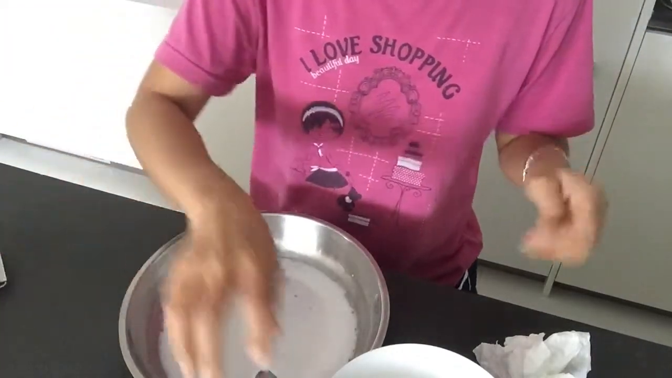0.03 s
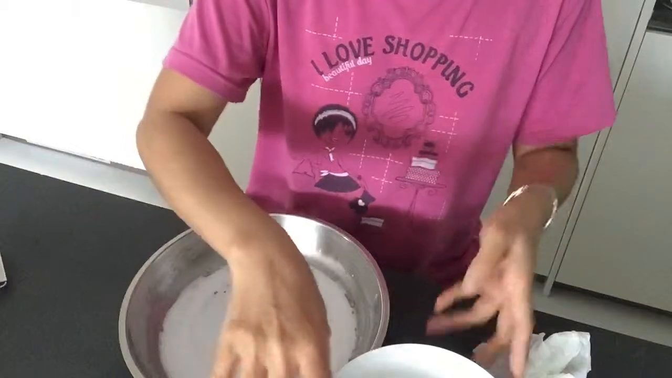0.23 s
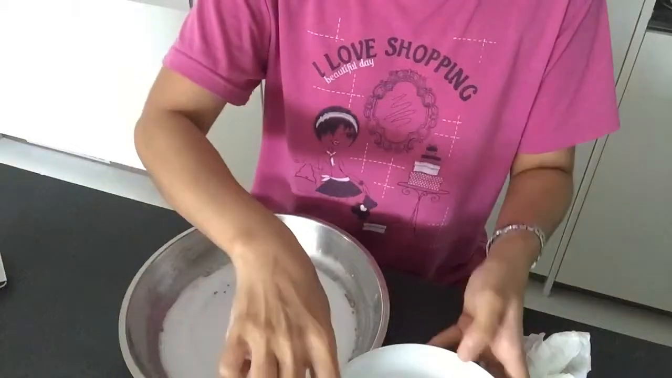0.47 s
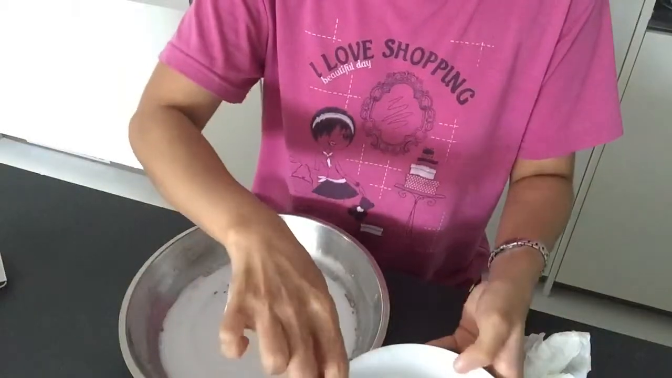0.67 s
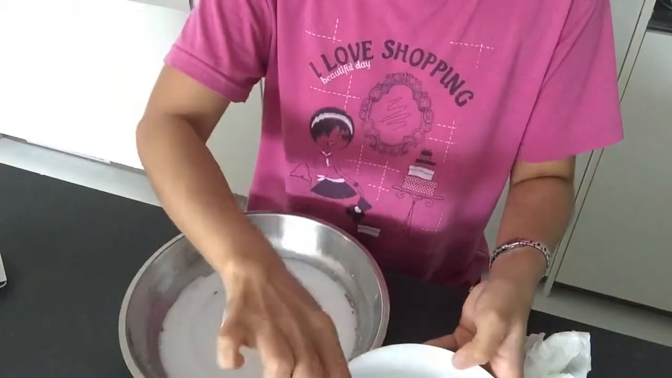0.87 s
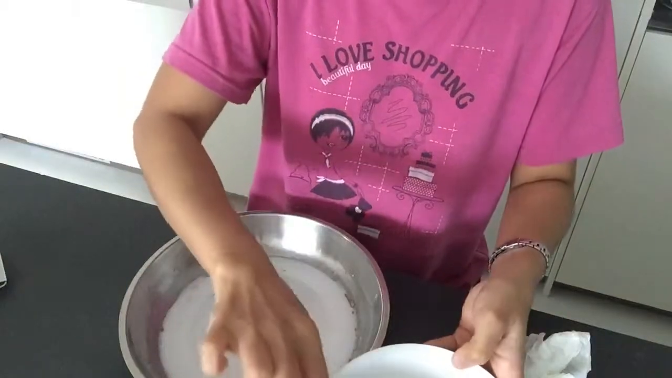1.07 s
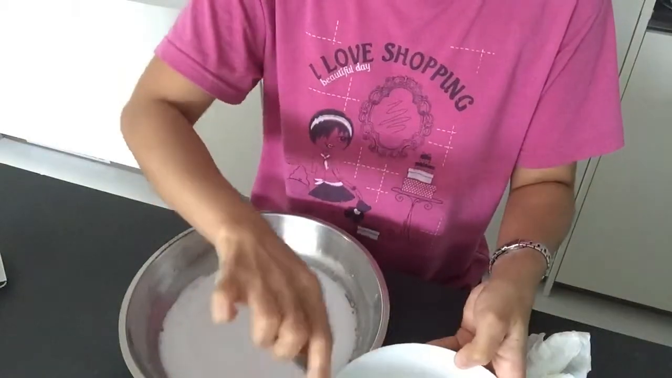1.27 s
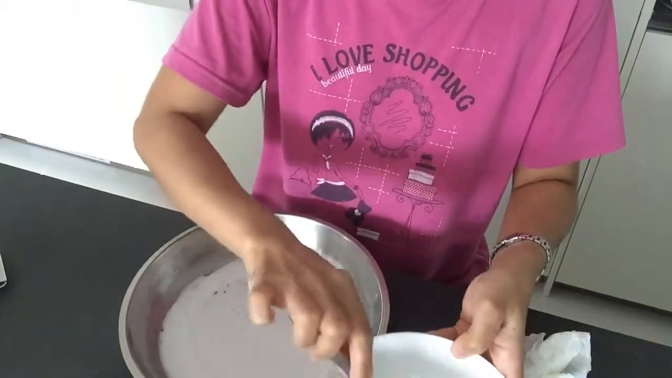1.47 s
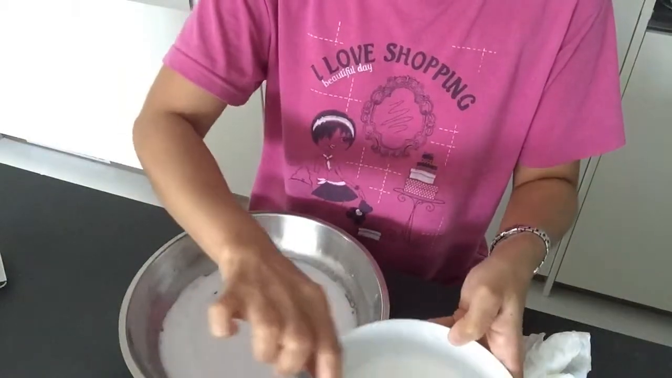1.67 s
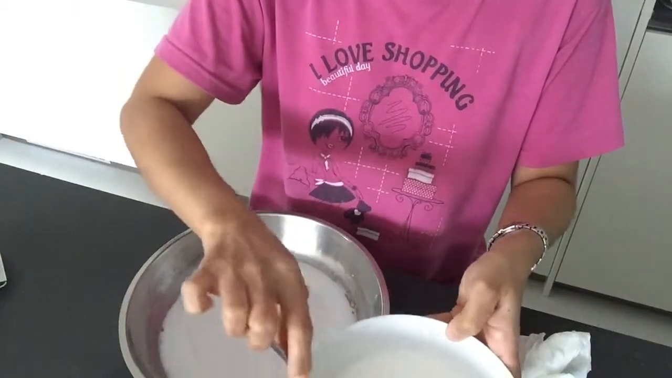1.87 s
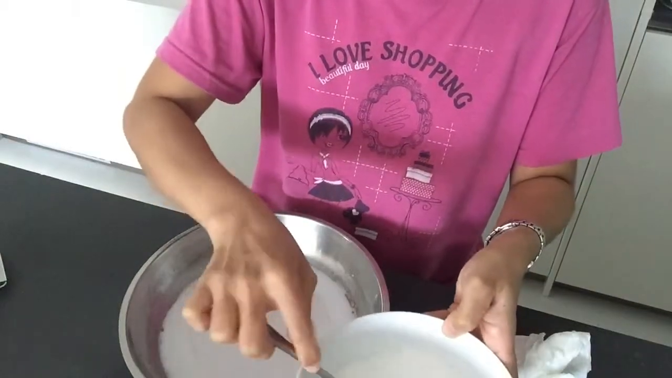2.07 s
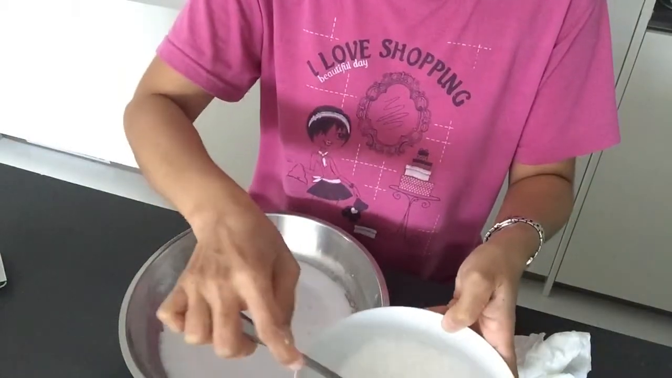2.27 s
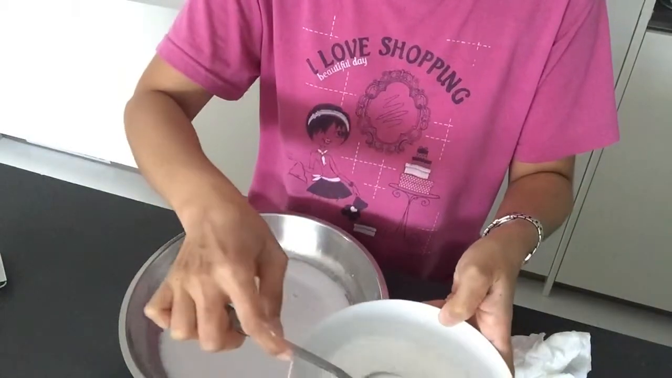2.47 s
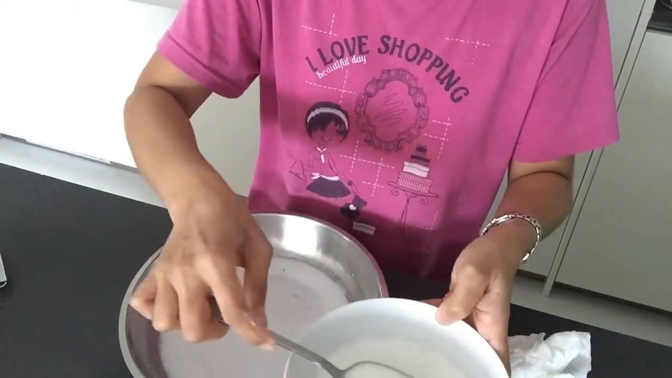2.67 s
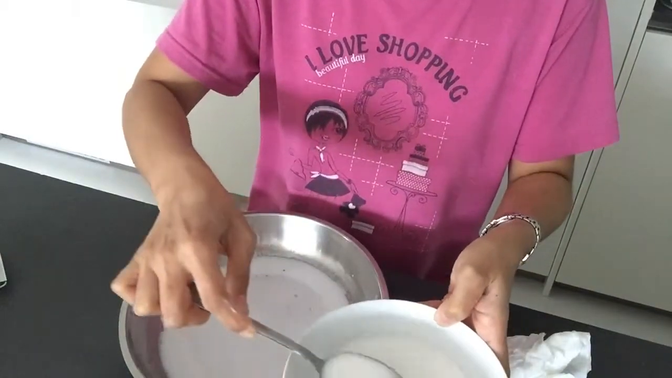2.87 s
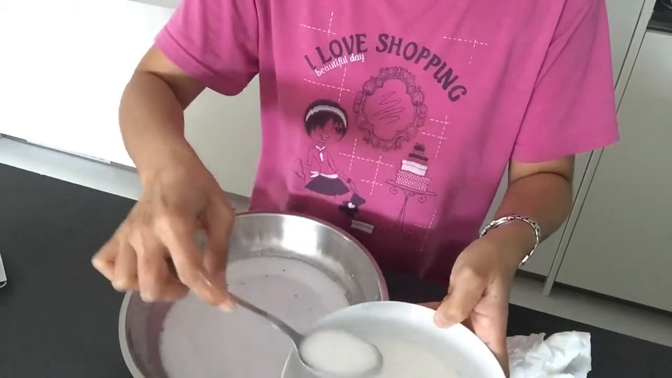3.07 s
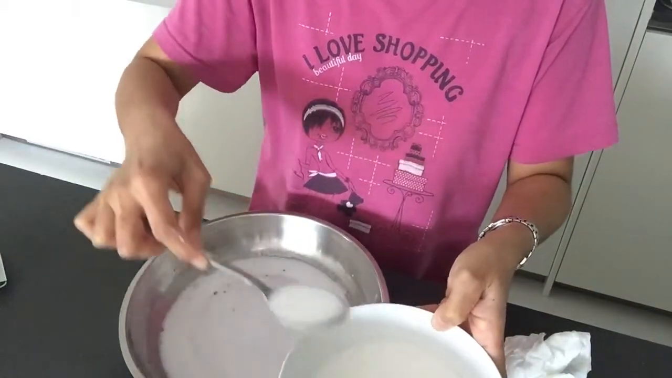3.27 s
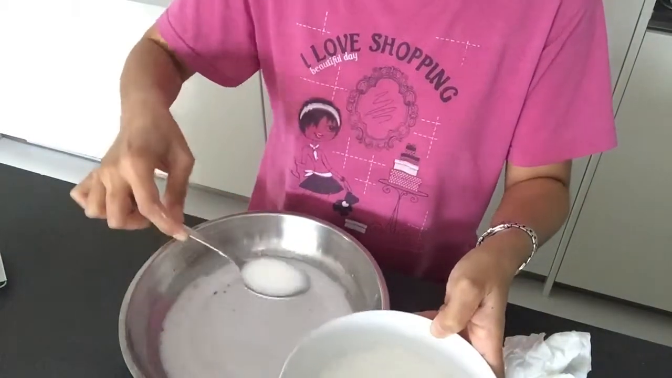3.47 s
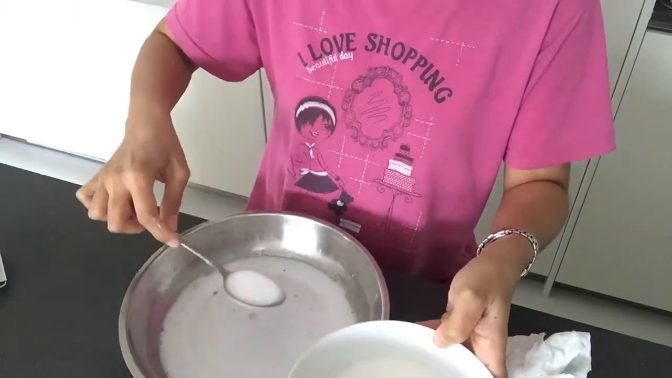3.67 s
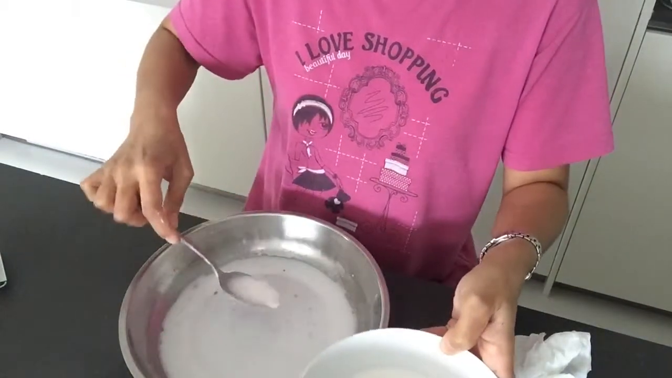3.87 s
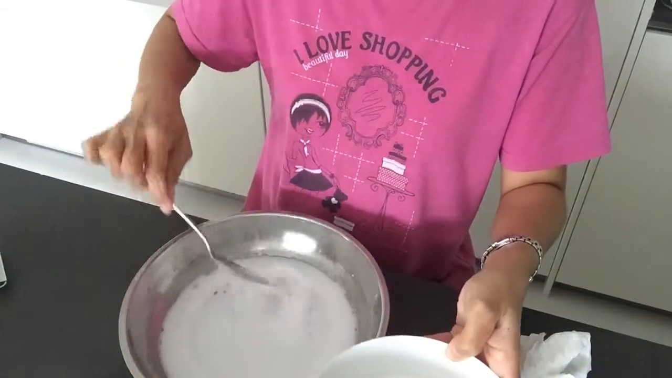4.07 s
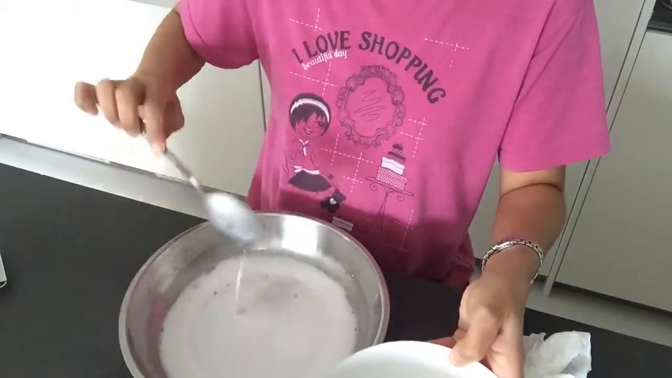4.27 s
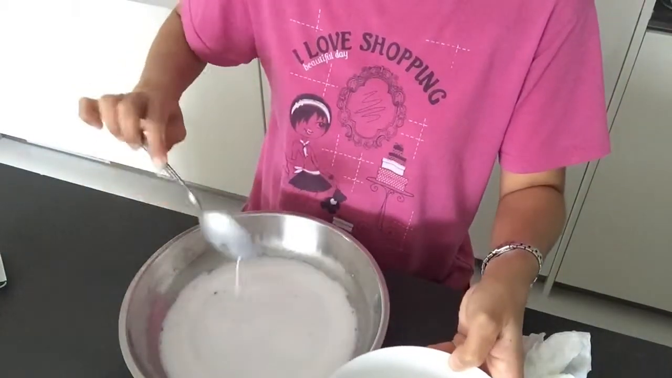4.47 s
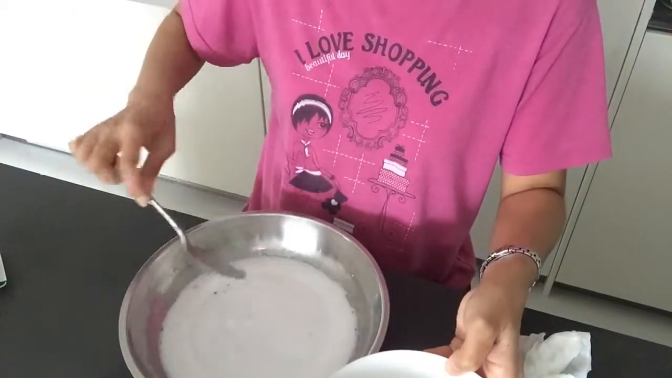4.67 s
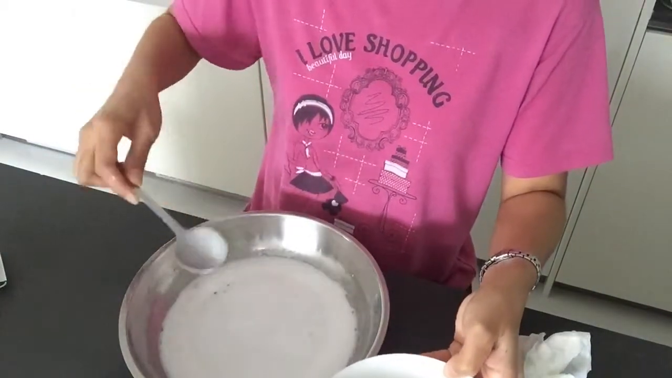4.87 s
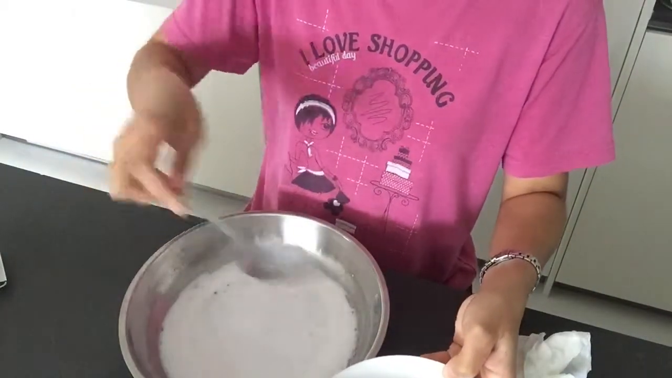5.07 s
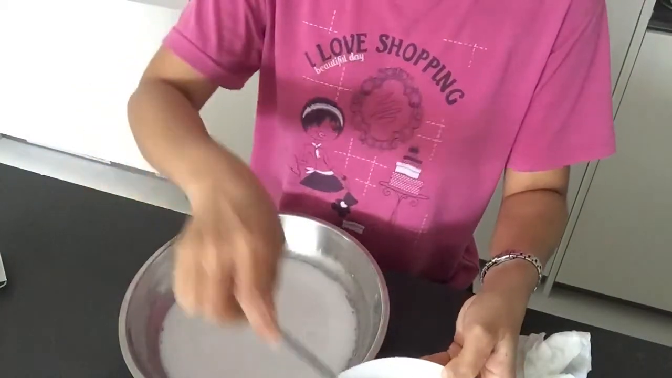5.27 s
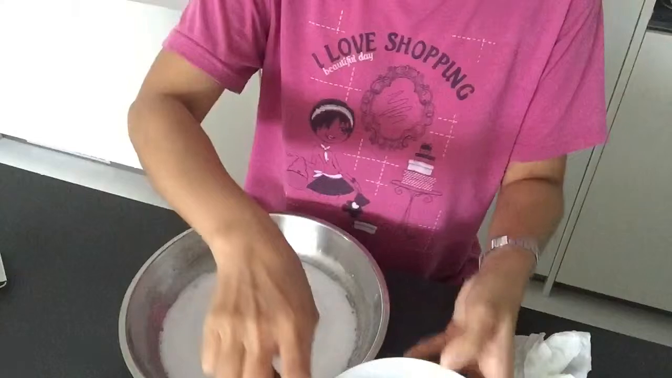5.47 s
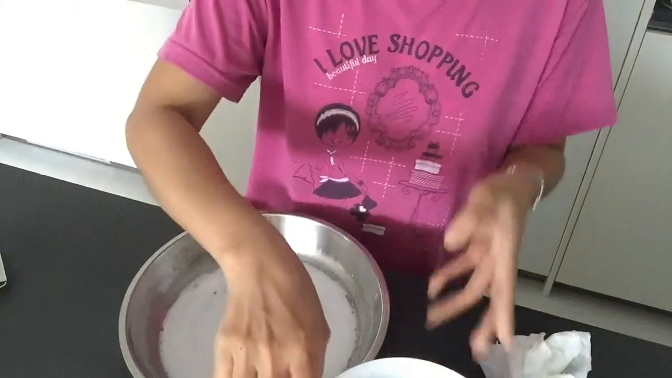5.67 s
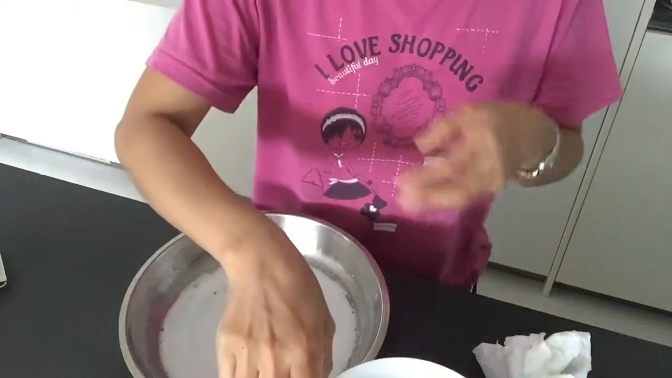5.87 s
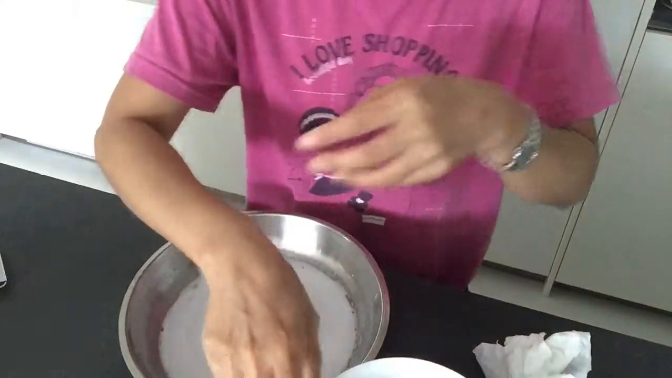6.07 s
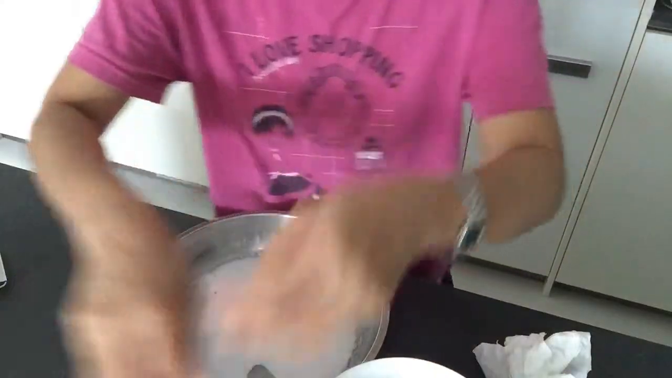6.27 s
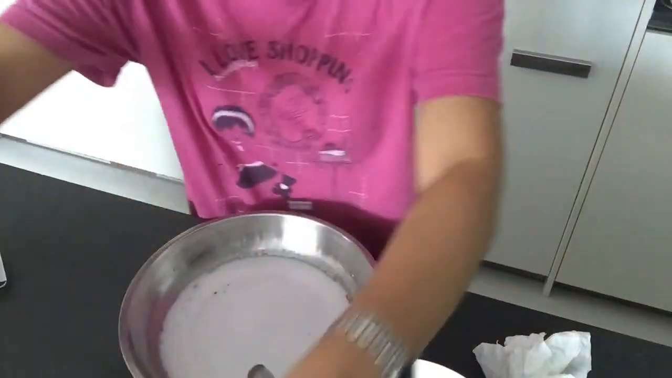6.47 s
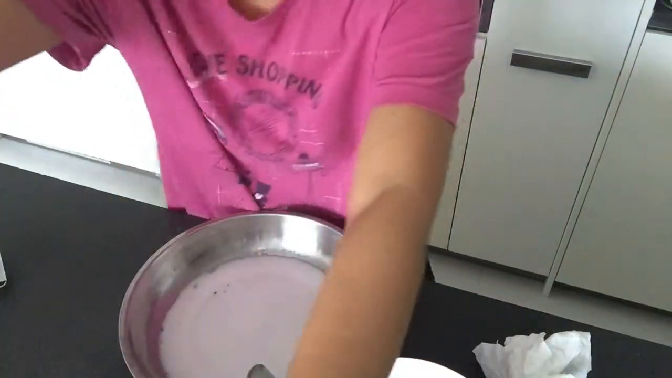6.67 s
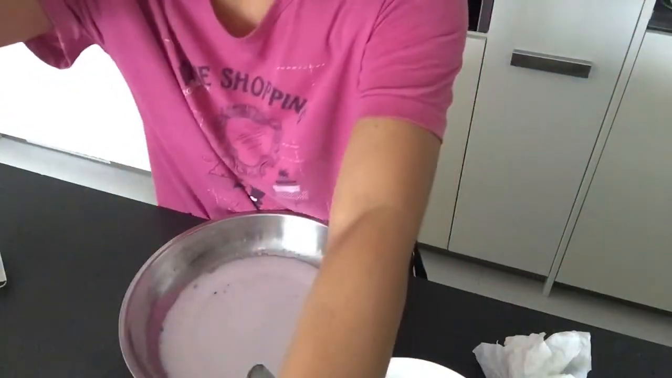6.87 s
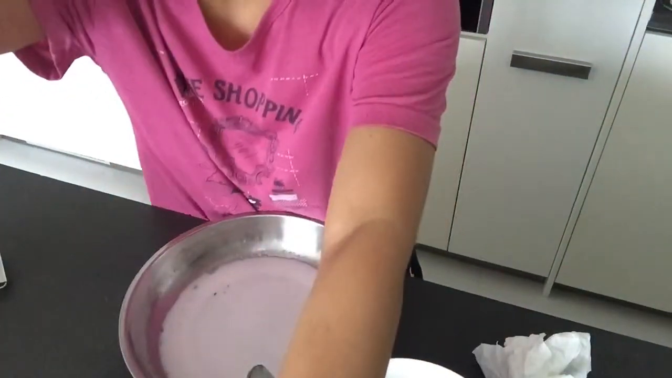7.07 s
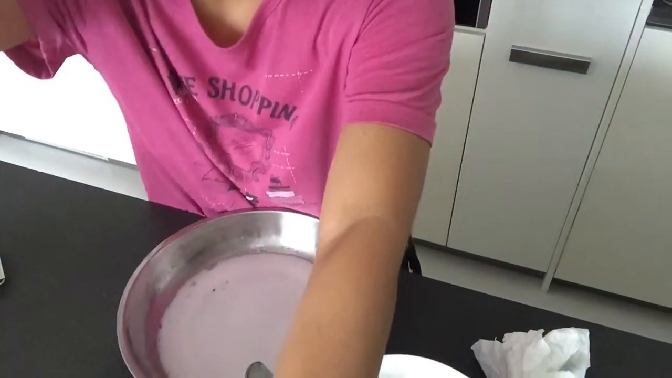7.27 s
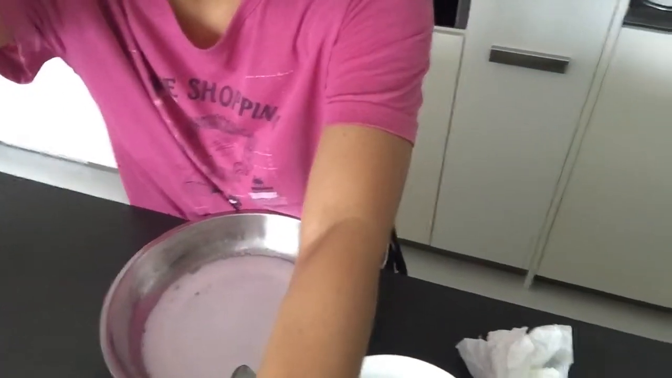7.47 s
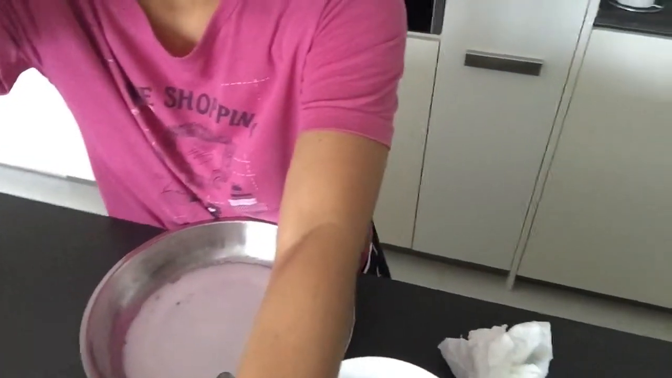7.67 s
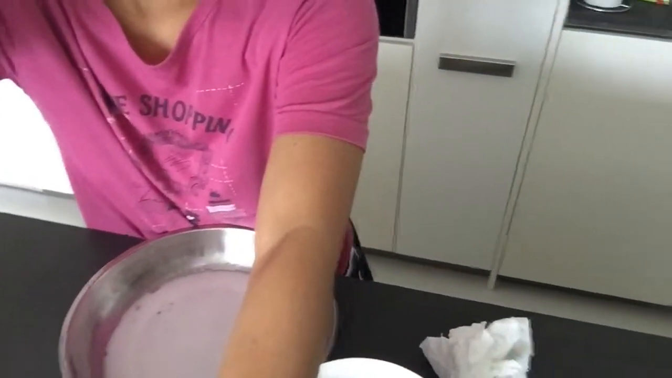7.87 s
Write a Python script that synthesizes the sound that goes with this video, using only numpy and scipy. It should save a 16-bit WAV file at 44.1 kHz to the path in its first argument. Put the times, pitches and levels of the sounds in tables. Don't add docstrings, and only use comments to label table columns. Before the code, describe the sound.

Close in a small reflective kitchen, a china bowl clacks loudly, a steel spoon drops in, clinks and scrapes briefly. After a quiet pause the spoon knocks dully twice on a full metal pan, distorting the microphone. The bowl is set down and rattles to rest; soft handling thumps end it over steady air hiss and fridge hum.

```python
import sys
import numpy as np
from scipy import signal
from scipy.fft import rfft, irfft
from scipy.io import wavfile
from scipy.ndimage import uniform_filter1d, map_coordinates

SR = 44100
rng = np.random.default_rng(int(sys.argv[2]) if len(sys.argv) > 2 else 0)


def makeup_ratio(level_db):
    decades = np.asarray(level_db, float) / 20
    return 10 ** decades


def dump(signal):
    limited = np.clip(np.atleast_2d(signal).T, -1, 1)
    pcm = np.round(limited * 32767).astype(np.int16)
    wavfile.write(sys.argv[1], SR, pcm)


N = 349272

# start in seconds, peak in dB, tilt in dB per octave, chatter T60 in seconds,
# room share in dB.
SPOON_TICKS = [(1.0709, -8.5, -2, 0.01, -8.5), (1.0787, -13, 0, 0.021, -3), (1.329, -11.5, -5, 0.0032, -3),
               (1.521, -33.5, -1, 0.04, 6), (1.5404, -4, -8, 0.0032, -9), (1.625, -28, 4.5, 0.013, -20),
               (1.729, -41, -6.5, .02, 9.5), (2.088, -24.5, 27, 0.0055, -8), (2.112, -26, 8.5, 0.0028, -20),
               (2.22, -48, 32, .003, -10), (7.271, -45, -5, 0.0062, -4.5), (7.679, -33, 1.5, 0.0073, -7)]
BOWL_CLACKS = [
    (0.651, 1, 0.73, 0.012, -6.5),
    (5.787, -3.5, -0.54, 0.022, -5),
    (5.807, -10, -1.5, 0.03, -16),
]
BOWL_ROCKS = [(6.12, -10.5, -2.5, 0.044, -2), (6.137, -22.5, 8.5, .012, 4), (6.249, -28.5, -8, 0.031, 1),
              (6.355, -29, -12, 0.012, -7), (6.392, -21, -1.5, 0.07, -7.5), (6.4495, -25.5, -3, 0.025, -12),
              (6.489, -39, -1, .012, 7)]
SPOON_RATTLES = [
    (6.171, -9.5, 2.5, 0.023, 2.5),
    (6.1825, -9.5, -2, 0.057, -9),
    (6.304, -13.5, -1.5, 0.033, 0.5),
    (6.318, -19.5, -3.5, 0.033, -19),
]
SPOON_CLINKS = [
    (.001, -40.5, 18, 0.15, -8),
    (0.446, -36.5, 5.1, 0.45, -3),
    (1.278, -2.5, 0.5, 0.012, -3),
]
EDGE_CLINKS = [
    (1.9805, -0.75, 0.85, 0.0089, -4),
]
# start in seconds, peak in dB, chatter T60 in seconds, room share in dB.
PAN_KNOCKS = [
    (4.926, 3, 0.0041, -4),
    (4.933, -7.5, .012, -7.5),
    (5.2905, 8, 0.0094, -21.5),
    (5.2939, 8.5, 0.0021, -10),
    (5.301, -4.5, 0.0048, -5.5),
    (5.3093, 4.5, 0.0054, -1.5),
    (5.323, -12.5, 0.0022, 1),
    (5.331, -13, .0022, 6),
]
# start in seconds, peak in dB, tilt in dB per octave.
COUNTER_THUDS = [(.49, -42, -24), (.655, -23, 3.5), (1.073, -27.5, 4), (5.79, -26.5, 11), (6.122, -27, -6),
                 (6.174, -27.5, -7), (6.255, -33, -3), (6.305, -34.5, -12), (6.355, -32.5, -4),
                 (6.393, -36.5, -4), (6.451, -37.5, -4), (6.5, -40.5, -7), (7.679, -38, 33)]
# start in seconds, peak in dB.
FINGER_THUMPS = [(7.367, -42), (7.394, -39), (7.473, -20), (7.525, -46), (7.687, -42), (7.725, -26.5),
                 (7.786, -38.5), (7.886, -24), (7.897, -24.5)]

# mode in Hz, level in dB, T60 in seconds.
BOWL_HELD_MODES = [(694, -15, .0046), (1094, -0.5, 0.012), (1465, -4, 0.024), (1633, -1.5, 0.0058),
                   (2100, -9.5, 0.028), (2420, 4, 0.0097), (2960, 2.5, 0.016), (3650, -13.5, 0.021),
                   (4780, 1.5, 0.0048), (5540, -2, 0.0077), (6140, -11, 0.0063), (7580, -12, 0.0041),
                   (9320, -17, .0066), (11450, -9, .0018), (14360, -22, .005)]
BOWL_SET_MODES = [(650, -8, 0.019), (980, 5, 0.0057), (1430, -3, 0.014), (1713, -6.5, 0.047),
                  (2096, 0.5, 0.026), (2590, 1.5, 0.011), (2790, 4.5, 0.013), (3350, -2.5, 0.0093),
                  (3690, -12.5, 0.028), (4170, 0, 0.007), (4900, -8, 0.0071), (5210, -3, 0.0065),
                  (6500, -9, 0.0051), (7400, -16, 0.0063), (10500, -11, 0.002)]
SPOON_HELD_MODES = [(1064, -6, 0.012), (1590, -2, 0.014), (1880, -5.5, 0.04), (2140, -2, 0.052),
                    (2530, -1, 0.015), (3000, 4.5, 0.0074), (3880, -10, 0.025), (3900, -10, 0.066),
                    (4370, 1, 0.013), (5420, -1.5, 0.0045), (6040, 8, 0.0088), (6560, -11, 0.0062),
                    (7320, -1, 0.0049), (8860, -7, 0.004), (10800, -10, 0.0034), (11800, -10, 0.006),
                    (14400, -27, .008)]
SPOON_EDGE_MODES = [(923, -11.5, 0.018), (1280, -11.5, 0.0094), (1694, -13.5, 0.021), (2045, -11, 0.021),
                    (2524, -9.5, 0.022), (2830, -9.5, 0.019), (3650, -10, 0.023), (3940, -20, 0.079),
                    (4290, -0.8, 0.0071), (5350, -4, 0.0065), (6050, -11, 0.01), (7900, -11.5, 0.0029),
                    (8780, -12, 0.0082), (11600, -20, .008), (14400, -22, .008)]
BOWL_DROP_MODES = [(784, -6, 0.01), (1025, 3.5, 0.011), (1415, -1, 0.013), (1800, -4.5, 0.014),
                   (2050, -6.5, 0.025), (2380, -3, 0.0054), (3120, -2.5, 0.013), (3750, -0.5, 0.0075),
                   (4450, -5.5, 0.015), (4820, -6, 0.013), (5300, -8, 0.012), (6080, -10, 0.008),
                   (7100, -6.5, 0.0088), (9200, -20, .004)]
BOWL_WET_MODES = [(852, -1.5, 0.008), (1082, 5, 0.0097), (1410, 3.5, 0.0082), (1835, -2, 0.022),
                  (2130, 0, 0.026), (2680, 11.5, 0.0034), (3180, 2, 0.022), (3940, 1, 0.0067),
                  (4920, -17, 0.021), (5250, -9.5, 0.013), (6140, -7.5, 0.0097), (7040, -13, 0.0034),
                  (9250, -22, 0.0045), (11900, -49, .005)]
BOWL_ROCKING_MODES = [(568, -18.5, 0.064), (810, -10, 0.026), (1040, -6.5, 0.017), (1505, -6.5, 0.0099),
                      (2060, 0, 0.023), (2490, 0.5, 0.0068), (3080, 3, 0.0096), (3500, -3.5, 0.0065),
                      (3940, -12, 0.0093), (4280, -8.5, 0.0089), (5500, -9, 0.0091), (6200, -11, 0.014),
                      (6550, -8, 0.0063), (8380, -16, 0.0082), (9600, -17, 0.0048), (11700, -12, 0.0067),
                      (14500, -31, .008)]
SPOON_RATTLING_MODES = [(566, -21, 0.031), (823, -10.5, 0.027), (1036, -6, 0.022), (1495, -6.5, 0.01),
                        (2062, 0, 0.044), (2520, -0.5, 0.0082), (2930, 2, 0.011), (3420, -2, 0.008),
                        (3970, -5, 0.0096), (4300, -7, 0.009), (5470, -3, 0.015), (5900, -3, 0.0077),
                        (6210, -5, 0.012), (8500, -15, 0.0092), (9500, -15.5, 0.005), (11700, -15, 0.0067),
                        (14500, -29, .008)]
PAN_RIM_MODES = [(117.7, -32.5, 0.2), (172.6, -31.5, 0.35), (248, -25.5, .1), (392.3, -19, 0.014),
                 (560, -12, 0.013), (676, -20.5, 0.1), (768, -5.5, 0.029), (900, -1.5, 0.014),
                 (1040, 2.5, 0.016), (954, -34, 0.1), (1320, -6.5, 0.008), (1645, -12, 0.008),
                 (1760, -13, 0.018), (2300, -24.5, .01)]
PAN_FULL_MODES = [(119, -35, 0.41), (176, -36, 0.4), (231.4, -35.5, .09), (405.6, -23.5, 0.0089),
                  (600, -23.5, 0.0027), (679.5, -25, 0.22), (784, -12, 0.023), (880, -2, 0.011),
                  (1010, 5.5, 0.014), (1043, -28.5, 0.3), (1420, -11, 0.0038), (1665, -8.5, 0.0098),
                  (1817, -15.5, 0.01), (2620, -23.5, .005)]
COUNTER_MODES = [(120.3, -21.5, 0.17), (183, -5, 0.077), (268, 7.5, 0.033), (436, -5.5, 0.083),
                 (574, -4.5, 0.033)]
CASING_MODES = [(59.4, -5.5, 0.023), (110.2, -1.5, 0.018), (205.2, -9, 0.021), (337, -1.5, 0.011)]

# mode in Hz, level in dB, T60 in seconds.
DROP_RING_MODES = [(2046, -1, 0.2), (2945, 0, 0.098), (3090, -15, 1.4), (3370, -20, 2.2), (3763, -11, 0.16),
                   (3871, -8, 0.27), (4457, -17, 1.2), (5160, -18, 0.28), (6072, -20, 0.22),
                   (6988, -24, 0.28)]
CLINK_RING_MODES = [(1513, -24, 5.0), (2060, -4, 0.27), (2520, -14, 0.078), (2970, -17, 5.0),
                    (3880, -8, 0.19), (4118, -6, 0.19), (4834, -18, 0.25), (5103, -16, 0.19),
                    (5981, -18, 0.33), (8500, -31, 1.9), (9017, -19, 0.31), (9200, -32, 1.8),
                    (11380, -12, 0.29), (14360, -24, 0.26)]
EDGE_RING_MODES = [(1319, -9, 0.72), (1580, -25, 5.0), (1965, -8, 0.39), (2030, -22, 5.0), (2575, -5, 0.14),
                   (2770, 0, 0.057), (3548, -2, 0.088), (3860, -2, 0.31), (4420, -7, 0.18),
                   (5060, -20, 0.41), (6100, -23, 2.6), (6600, -11, 0.38)]
BLIP_MODES = [(1383, 0, 0.053), (1240, -10, .03)]
HIGH_BLIP_MODES = [(3760, -1, .04), (1660, -5, .04)]
PAN_HUM_MODES = [(353, 0, 0.55)]
COUNTER_HUM_MODES = [(545, -0.5, 0.25), (500, -2, 0.17)]
# start in seconds, level in dB.
AFTER_RINGS = [
    (1.079, -31),
    (1.278, -22),
    (1.98, -29),
    (2.089, -29.5),
    (2.113, -34.5),
    (.655, -45.5),
    (1.075, -45),
    (5.79, -38),
]
NEIGHBOUR_SHARES = [-1, -.43, .12, .58, .95]

# start in seconds, free until in seconds, lowest mode in dB,
# 2 kHz group in dB, upper group in dB.
BOWL_RINGS = [(.654, 0.836, -36, -25, -20), (1.07, 1.18, -56, -39, -48), (1.278, 1.483, -62, -31.5, -58),
              (5.794, 6.133, -29, -24.5, -46), (6.116, 6.174, -43, -32, -39), (6.17, 6.29, -41.5, -26, -42),
              (6.308, 6.367, -72, -28, -37), (6.388, 6.438, -65, -41, -37), (6.444, 6.548, -58, -42.5, -50)]
# mode in Hz, level in dB, T60 in seconds.
BOWL_FREE_MODES = [(789, 3, 1.29), (2004, -7.5, 0.57), (2054, -1.5, 0.41), (2095, 2.5, 0.21),
                   (2240, -23, 0.28), (2610, -2, 0.14), (3140, -1, 0.15)]
BOWL_GROUP_TOPS_HZ = [1000, 2250]
# start in seconds, end in seconds, level at the end in dB, growth in dB per second.
SPOON_HUMS = [
    (0, .43, -52, -16),
    (.58, .72, -48, 51),
    (1.05, 1.265, -49.5, 23),
]
# mode in Hz, level in dB, T60 in seconds.
SPOON_FREE_MODES = [(1133, -1, 3.4), (4732, 3, 0.7), (4747.5, 1.5, .4), (5800, 3, .1), (9030, 1.5, .3),
                    (9085, -4, .15), (8960, -6, .12)]
# start in seconds, then levels of the 1.1, 4.7, 5.8 and 9 kHz groups in dB.
SPOON_TOUCHES = [
    (.002, -57.5, -69, -70, -49.5),
    (0.166, -72, -63, -80, -78),
    (0.446, -77, -70, -59, -40),
    (0.455, -81, -47.5, -58, -58),
]
SPOON_GROUP_TOPS_HZ = [2000, 5000, 7000]
# start in seconds, end in seconds, pressure at the end in dB,
# growth in dB per second.
SLIDES = [(1.16, 1.262, -38.5, 123), (2.1, 1.3, -52, 498), (1.885, 1.98, -35.5, 74),
          (1.515, 1.535, -45, 98), (5.26, 5.288, -37.5, 599), (4.91, 4.92, -41, 1092),
          (5.3, 5.78, -40.5, 899)]
# mode in Hz, level in dB, T60 in seconds.
GLAZE_MODES = [(1010, -10, 0.027), (1250, 4, 0.034), (1370, -1, 0.042), (1740, -3.5, 0.074),
               (2530, -7, .02), (3410, -1.5, 0.02), (4060, -11.5, .02)]
# centre in seconds, spread in seconds, level in dB.
RUSTLES = [
    (3.9, 0.01, -61),
    (6.386, .015, -62),
    (6.445, 0.027, -50.5),
    (6.595, 0.027, -52),
]

# frequency in Hz, level in dB, T60 in seconds.
KITCHEN_ECHO = [(100, 4.5, 0.55), (284, 2, 0.54), (970, -5, 0.5), (2904, -3, 0.41), (7125, -7, 0.37),
                (14000, 2.5, 0.1)]
# centre in Hz, width in Hz, gain in dB.
ECHO_COLOUR = [(938, 95, -4), (1015, 99, 0.5), (1550, 340, 0.5), (219, 47, -2.5), (2900, 470, -0.5),
               (4000, 400, 2.5)]
# frequency in Hz, density in dB per Hz.
AIR = [(15, -31.5), (25, -16), (53, -1), (70, -10.5), (103, 1), (202, -5.5), (281, -5.5), (398, -7.5),
       (429, -11), (544, -9.5), (845, -13), (961, -12.5), (2000, -15.5), (2600, -49), (4400, -120)]
HISS = [(2000, -13), (3300, -13), (4300, -17), (6200, -16), (8000, -22.5), (9800, -25), (12000, -27.5),
        (16000, -31)]
# frequency in Hz, level in dB.
FRIDGE = [(49.5, -66.5), (100, -63), (431, -66), (576, -84), (986, -69.5), (2396, -70.5), (2697, -71.5),
          (2797, -77.5), (2897, -75.5), (6094, -76)]
# centre in Hz, width in Hz, gain in dB.
MICROPHONE = [(3810, 320, 4.5), (4930, 200, -4), (10440, 710, -6.5)]

BRIGHTEN_OCTAVES_PER_DB = 0.03
SPREAD_AT_10K_HZ = 130
SPOON_HUM_HZ, HUM_SWELL_DB_PER_S, HUM_FADE_DB_PER_S = 1759, 170, 200
SLIDE_START_DB_PER_S, SLIDE_LIFT_DB_PER_S = 759.5, 1501.5
AIR_DB = -51
WET_DB, TONES_TO_ROOM_DB, AFTER_RING_ROOM_DB = -4.0, -13.0, -3


def rms_one(x):
    return x / np.sqrt(np.mean(x ** 2) + 1e-20)


def at_hz(points, hz, axis=1):
    points = np.array(points)
    return np.interp(np.log(hz + 1e-9), np.log(points[:, 0]), points[:, axis])


def add(out, start_s, x):
    i = round(start_s * SR)
    out[i:i + len(x)] += x[:N - i]


def band_pass(x, order, low_hz, high_hz):
    return signal.sosfilt(signal.butter(order, [low_hz, high_hz], "band", fs=SR, output="sos"), x)


def ring(force, hz, t60_s):
    r = makeup_ratio(-60 / (max(t60_s, .002) * SR))
    w = 2 * np.pi * hz / SR
    return signal.lfilter([0, np.sin(w)], [1, -2 * r * np.cos(w), r * r], force + 1e-18)


def drift(rate_hz):
    steps = rng.standard_normal(int(rate_hz * N / SR) + 3)
    return map_coordinates(steps, [np.arange(N) / SR * rate_hz], order=3)


def strokes(rows, rise_db_per_s, fall_db_per_s):
    t = np.arange(N) / SR
    gain = 0
    for start_s, end_s, end_db, growth_db_per_s in rows:
        held_db = end_db + growth_db_per_s * (np.clip(t, start_s, end_s) - end_s)
        rise_db = rise_db_per_s * np.maximum(start_s - t, 0)
        fall_db = fall_db_per_s * np.maximum(t - end_s, 0)
        gain = gain + makeup_ratio(held_db - rise_db - fall_db)
    return gain


def bell(x, hz, width_hz, db):
    a, w = makeup_ratio(db / 2), 2 * np.pi * hz / SR
    q = np.sin(w) * width_hz / hz / 2
    return signal.lfilter([1 + q * a, -2 * np.cos(w), 1 - q * a], [1 + q / a, -2 * np.cos(w), 1 - q / a], x)


def coloured(x, peaks):
    for hz, width_hz, db in peaks:
        x = bell(x, hz, width_hz, db)
    return x


def contacts(events, body, low_hz, hard_hz, centre_hz, spread_db):
    direct, sent = np.zeros(N), np.zeros(N)
    t = np.arange(SR // 2) / SR
    click = np.arange(len(t)) == 0
    chance = rng.standard_normal((len(events), 4096 + len(body)))
    for (start_s, peak_db, tilt_db, chatter_t60_s, room_db), draw in zip(events, chance):
        blow = 0
        for k, (hz, db, t60_s) in enumerate(body):
            level_db = db + tilt_db * np.log2(hz / centre_hz) + spread_db * draw[4096 + k]
            blow = blow + (-1) ** k * makeup_ratio(level_db) * ring(click, hz, t60_s)
        soft_hz = hard_hz * 2 ** (BRIGHTEN_OCTAVES_PER_DB * tilt_db)
        blow = band_pass(blow, 3, low_hz, min(soft_hz, .45 * SR))
        chatter = draw[:4096] * makeup_ratio(-60 * t[:4096] / max(chatter_t60_s, .001))
        chatter[0] += 3.0
        spectrum = rfft(chatter)
        chatter = irfft(spectrum / uniform_filter1d(np.abs(spectrum), size=31))[:3800]
        hit = signal.fftconvolve(blow, chatter)[:len(t)]
        hit *= makeup_ratio(peak_db) / np.abs(hit).max()
        add(direct, start_s, hit)
        add(sent, start_s, rms_one(blow) * np.std(hit) * makeup_ratio(room_db))
    return np.array([direct, sent])


def bowl_clacks():
    return (contacts(BOWL_CLACKS[:1], BOWL_HELD_MODES, 603, 8900, 2000, -1.0)
            + contacts(BOWL_CLACKS[1:], BOWL_SET_MODES, 494, 10000, 2000, 2.3))


def spoon_clinks():
    return (contacts(SPOON_CLINKS, SPOON_HELD_MODES, 735, 13700, 3500, 7.0)
            + contacts(EDGE_CLINKS, SPOON_EDGE_MODES, 724, 14000, 3500, 2.0))


def spoon_ticks():
    return (contacts(SPOON_TICKS[:2], BOWL_DROP_MODES, 590, 8000, 2000, 0.5)
            + contacts(SPOON_TICKS[2:], BOWL_WET_MODES, 670, 8150, 2000, 1.5))


def bowl_rocking():
    return (contacts(BOWL_ROCKS, BOWL_ROCKING_MODES, 510, 6340, 2500, 0.0)
            + contacts(SPOON_RATTLES, SPOON_RATTLING_MODES, 493, 14000, 2500, -1.0))


def pan_knocks():
    rows = [(s, db, 0.4, t60_s, room_db) for s, db, t60_s, room_db in PAN_KNOCKS]
    return (contacts(rows[:2], PAN_RIM_MODES, 95, 2795, 1000, 3.0)
            + contacts(rows[2:], PAN_FULL_MODES, 98.0, 2700, 1000, 3.5))


def counter_thuds():
    rows = [(s, db, tilt_db, 0.0089, -5) for s, db, tilt_db in COUNTER_THUDS]
    return contacts(rows, COUNTER_MODES, 91.5, 780, 260, 9.0)


def finger_thumps():
    rows = [(s, db, 0.1, 0.011, -20) for s, db in FINGER_THUMPS]
    return contacts(rows, CASING_MODES, 29.7, 483, 150, 4.5)


def after_rings():
    out, click = np.zeros(N), np.arange(SR // 2) == 0
    bodies = [DROP_RING_MODES, CLINK_RING_MODES, EDGE_RING_MODES, BLIP_MODES, HIGH_BLIP_MODES,
              PAN_HUM_MODES, PAN_HUM_MODES, COUNTER_HUM_MODES]
    for (start_s, level_db), modes in zip(AFTER_RINGS, bodies):
        for k, (hz, db, t60_s) in enumerate(modes):
            near_hz = hz + np.array(NEIGHBOUR_SHARES) * SPREAD_AT_10K_HZ * (hz / 1e4) ** 2
            bunch = sum(ring(click, f, min(t60_s, .5)) for f in near_hz) / len(near_hz)
            add(out, start_s, (-1) ** k * makeup_ratio(level_db + db) * bunch)
    return out


def bowl_rings():
    out, t = np.zeros(N), np.arange(SR // 2) / SR
    hits = SPOON_TICKS + BOWL_CLACKS + BOWL_ROCKS + SPOON_RATTLES + SPOON_CLINKS
    struck_s = np.array(hits)[:, 0]
    for near_s, until_s, *group_db in BOWL_RINGS:
        start_s = struck_s[np.argmin(np.abs(struck_s - near_s))]
        choke = makeup_ratio(-np.maximum(t - (until_s - start_s), 0) * 980.0)
        choke *= 1 - np.exp(-t / 0.0044)
        for k, (hz, db, t60_s) in enumerate(BOWL_FREE_MODES):
            chance_db = 2.0 * rng.standard_normal() * (k > 0)
            level_db = db + group_db[np.searchsorted(BOWL_GROUP_TOPS_HZ, hz)] + chance_db
            add(out, start_s, makeup_ratio(level_db - 60 * t / t60_s) * choke * np.sin(2 * np.pi * hz * t))
    return out


def spoon_rings():
    t = np.arange(N) / SR
    hum_gain = np.sqrt(2) * strokes(SPOON_HUMS, HUM_SWELL_DB_PER_S, HUM_FADE_DB_PER_S)
    out = hum_gain * np.sin(2 * np.pi * SPOON_HUM_HZ * t)
    touched = [round(row[0] * SR) for row in SPOON_TOUCHES]
    for k, (hz, db, t60_s) in enumerate(SPOON_FREE_MODES):
        group = np.searchsorted(SPOON_GROUP_TOPS_HZ, hz)
        clicks = np.zeros(N)
        clicks[touched] = makeup_ratio([row[group + 1] + db for row in SPOON_TOUCHES])
        out += (-1) ** k * ring(clicks, hz, t60_s)
    return out


def slides():
    slips = (rng.random(N) < 1500 / SR) * rng.standard_normal(N)
    slips = slips * makeup_ratio(2.0 * rng.exponential(1, N))
    grind = 0
    for hz, db, t60_s in GLAZE_MODES:
        grind = grind + makeup_ratio(db + 3.6 * drift(25)) * ring(slips, hz, t60_s)
    return rms_one(grind) * strokes(SLIDES, SLIDE_START_DB_PER_S, SLIDE_LIFT_DB_PER_S)


def bracelet():
    t = np.arange(N) / SR
    grit = rng.standard_normal(N) * makeup_ratio(2.5 * drift(300))
    grit = rms_one(signal.sosfilt(signal.butter(4, 11000, "high", fs=SR, output="sos"), grit))
    swell = sum(makeup_ratio(db) * np.exp(-.5 * ((t - s) / spread_s) ** 2) for s, spread_s, db in RUSTLES)
    return grit * swell


def kitchen(x):
    t = np.arange(SR * 3 // 4) / SR
    edges_hz = 60 * 2 ** np.arange(0, 8.4, .5)
    white, echo = rng.standard_normal((2, len(t))), 0
    for k, (low_hz, high_hz) in enumerate(zip(edges_hz, edges_hz[1:])):
        band = band_pass(white[k % 2], 2, low_hz, high_hz)
        hz = np.sqrt(low_hz * high_hz)
        decay_db = 60 * t / at_hz(KITCHEN_ECHO, hz, axis=2)
        echo = echo + band * makeup_ratio(at_hz(KITCHEN_ECHO, hz) - decay_db)
    echo *= 1 - np.exp(-(t / 0.0044) ** 2)
    return signal.fftconvolve(x, echo / np.sqrt(np.sum(echo ** 2)))[:N]


def air_noise():
    hz = np.fft.rfftfreq(N, 1 / SR)
    hiss_db = at_hz(HISS, hz) - HISS[0][1] + at_hz(AIR[:-1], 2000)
    shape_db = np.where(hz < 2000, at_hz(AIR[:-1], hz), hiss_db)
    return makeup_ratio(AIR_DB) * rms_one(irfft(rfft(rng.standard_normal(N)) * makeup_ratio(shape_db), N))


def fridge():
    t = np.arange(N) / SR
    tones = 0
    for hz, db in FRIDGE:
        level = makeup_ratio(db + 1.1 * drift(3.7))
        tones = tones + level * np.sin(2 * np.pi * hz * t + 0.67 * drift(2.5))
    return np.sqrt(2) * tones


def scene():
    direct, sent = (bowl_clacks() + spoon_clinks() + spoon_ticks() + bowl_rocking()
                    + pan_knocks() + counter_thuds() + finger_thumps())
    tones = bowl_rings() + spoon_rings() + slides()
    held = after_rings()
    room_feed = sent + makeup_ratio(TONES_TO_ROOM_DB) * tones + makeup_ratio(AFTER_RING_ROOM_DB) * held
    wet = makeup_ratio(WET_DB) * coloured(kitchen(room_feed), ECHO_COLOUR)
    return (direct + tones + held + wet + bracelet() + air_noise() + fridge())[None]


def roll_off(x):
    return signal.sosfilt(signal.butter(12, 16300, fs=SR, output="sos"), x)


def record(dry):
    x = signal.sosfilt(signal.butter(4, 42, "high", fs=SR, output="sos"), dry)
    x = signal.sosfilt(signal.cheby2(14, 40, 15900, fs=SR, output="sos"), x)
    x = coloured(x, MICROPHONE)
    return roll_off(np.clip(x, -1, 1))


dry = scene()
out = record(dry)
dump(out)
```